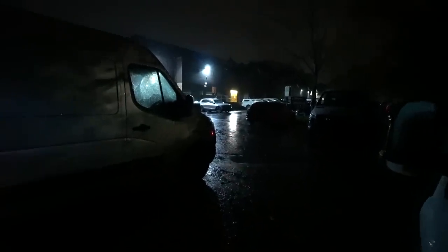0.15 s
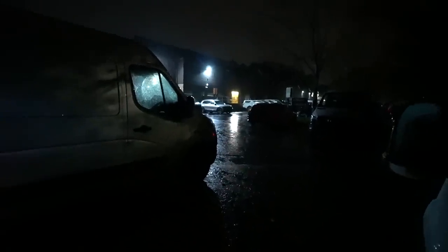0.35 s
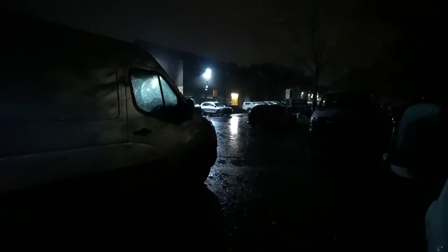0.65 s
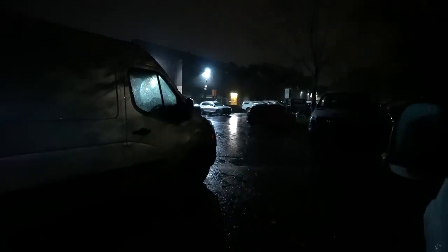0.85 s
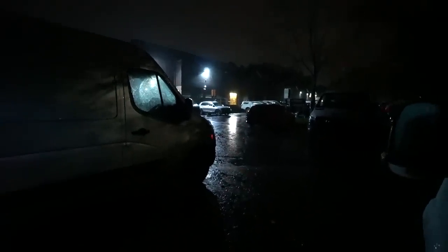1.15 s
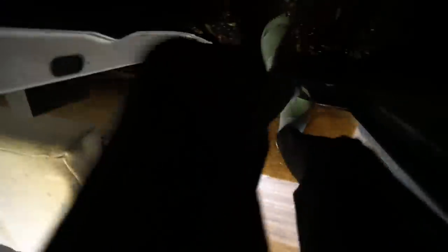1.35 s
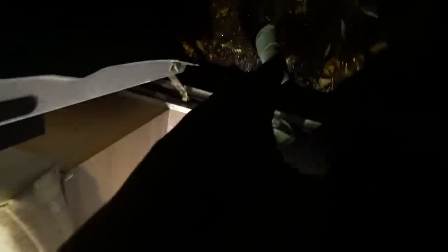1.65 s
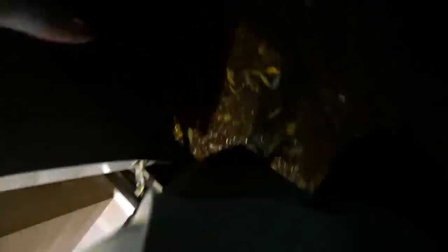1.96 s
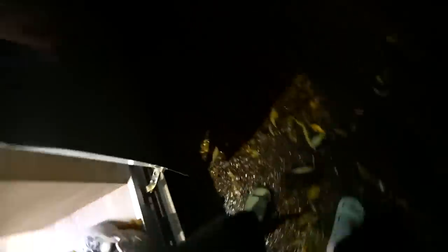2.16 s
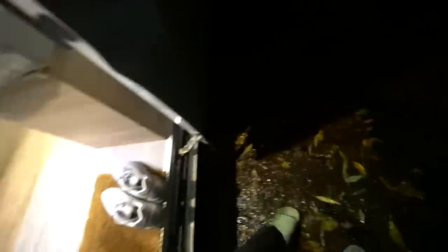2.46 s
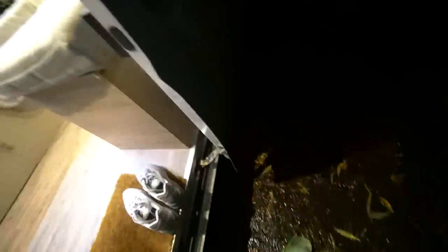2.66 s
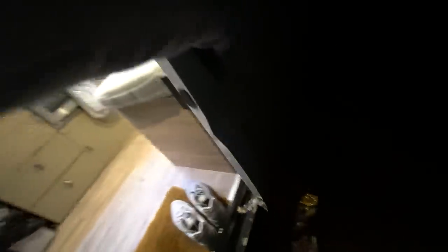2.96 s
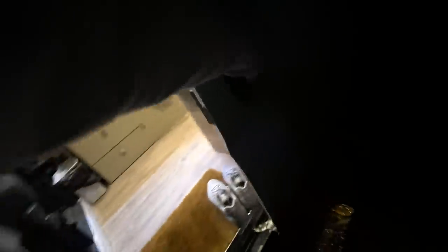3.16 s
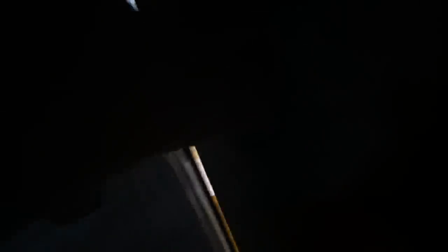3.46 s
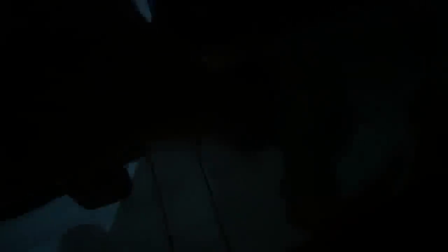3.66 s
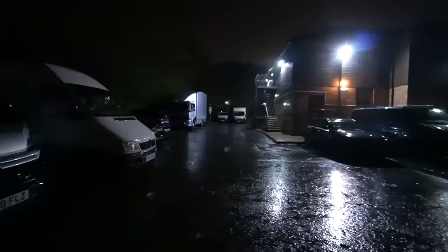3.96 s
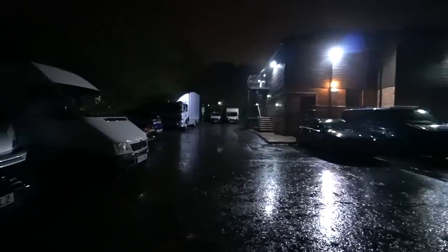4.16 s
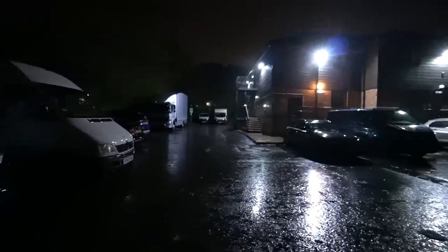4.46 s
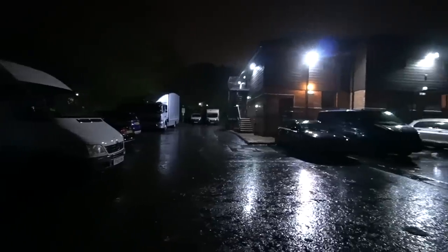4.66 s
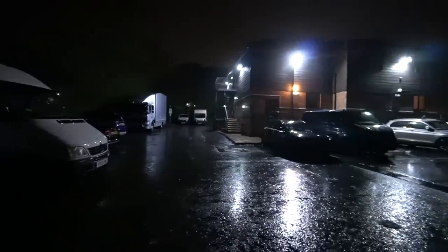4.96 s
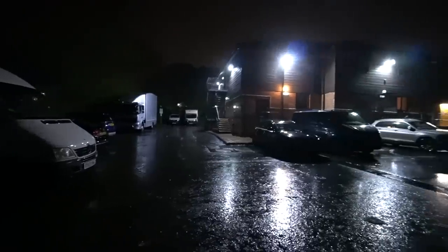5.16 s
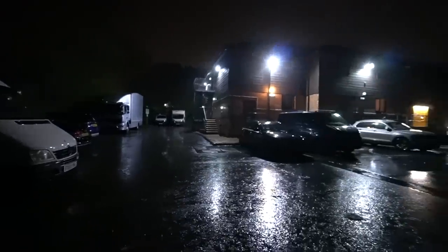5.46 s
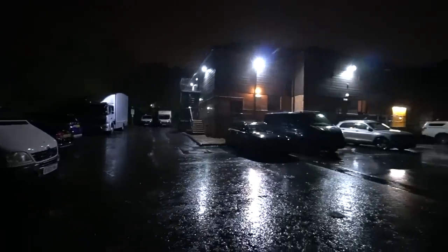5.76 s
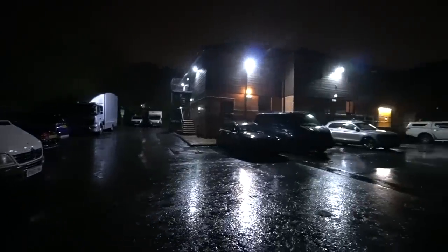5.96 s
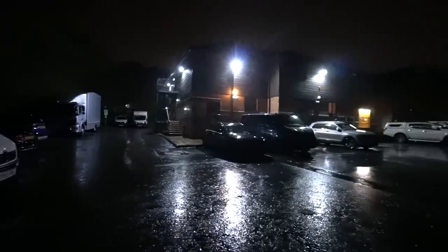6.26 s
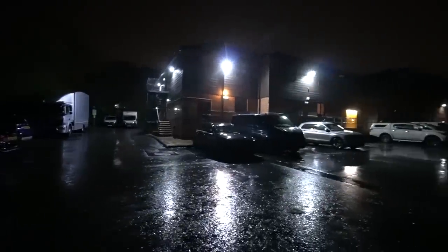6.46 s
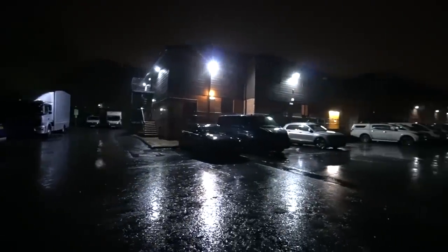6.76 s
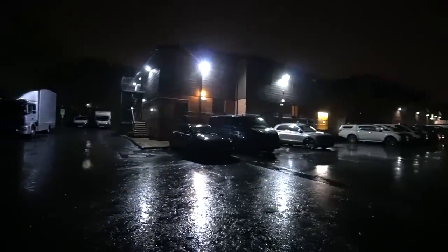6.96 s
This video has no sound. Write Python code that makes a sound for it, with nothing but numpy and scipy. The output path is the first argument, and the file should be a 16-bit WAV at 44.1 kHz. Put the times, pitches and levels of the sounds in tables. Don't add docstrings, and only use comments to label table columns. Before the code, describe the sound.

From 0 to 1.3 s heavy rain hisses and spatters close by on tarmac and parked cars, over uneven low air rumble. A fat drop thumps the microphone at 0.3 s, another at 1.1 s, as roof drumming swells around 1 s. The sound dips almost to silence at 1.32 s, then cuts to a van doorway: duller rain, a strong low shudder, rustling clothes and small ticks. At 1.75-2.05 s a shoe crunches and scuffs wet leaves and grit. Handle clicks begin near 2.65 s, with a clunk at 3.0 s; the sliding door rumbles louder, rattling, until it slams at 3.58 s, with metallic rebounds and boomy knocks to 3.8 s. At 3.87 s it cuts to an open yard: softer steady rain slowly rising to 7.1 s, with drop thumps near 4.3, 5.0 and 6.2 s, ticks around 6.7 s, and a very faint high whine after 5.1 s.

```python
import sys
import numpy as np
from scipy import signal
from scipy.fft import rfft, irfft, next_fast_len
from scipy.io import wavfile
from scipy.ndimage import uniform_filter1d, map_coordinates

SR = 44100
rng = np.random.default_rng(int(sys.argv[2]) if len(sys.argv) > 2 else 0)


def elevation(decibels):
    levels = np.asarray(decibels, float)
    return 10 ** (levels / 20)


def unload_wav(signal):
    wavfile.write(
        sys.argv[1],
        SR,
        np.round(np.clip(np.atleast_2d(signal).T, -1, 1) * 32767).astype(np.int16),
    )


N = 313992

CUTS = [
    1.325,
    3.866,
]


def unit(x):
    return x / np.sqrt(np.mean(x ** 2) + 1e-20)


def along(points, hz):
    f, v = np.transpose(points)
    return np.interp(np.log(hz + 1), np.log(f + 1), v)


def coloured(points):
    return lambda f: elevation(along(points, f))


def band(lo_hz, hi_hz):
    return lambda f: 1 / (1 + (lo_hz / (f + 1)) ** 4) / (1 + (f / hi_hz) ** 4)


def filtered(x, response):
    m = next_fast_len(N + SR // 2)
    spectrum = rfft(x, m) * response(np.fft.rfftfreq(m, 1 / SR))
    return unit(irfft(spectrum, m)[:N])


def curves(rows, outside_db=None):
    s, *cols = np.transpose(rows)
    return [np.interp(np.arange(N) / SR, s, c, outside_db, outside_db) for c in cols]


def shots():
    return np.searchsorted(CUTS, np.arange(N) / SR)


def per_shot(tables):
    return np.choose(shots(), [np.array(curves(rows)) for rows in tables])


def wobble(rate_hz):
    return map_coordinates(rng.standard_normal(N // 100), [np.arange(N) * rate_hz / SR])


def swell(s, rise_s, hold_s, fall_s):
    return np.interp(np.arange(N) / SR, np.cumsum([s, rise_s, hold_s, fall_s]), [0, 1, 1, 0])


def bump(s, width_s):
    return np.exp(-((np.arange(N) / SR - s) / width_s) ** 2)


def add(track, s, sound):
    track[round(s * SR):][:len(sound)] += sound[:N - round(s * SR)]


def crack(t, t60):
    snap = signal.lfilter([.3], np.poly([.55, .55, .55]), rng.standard_normal(len(t)))
    return snap * elevation(-60 * t / t60)


def patter(count, spread_db, share, patchy_db):
    z = signal.stft(rng.standard_normal(N), nperseg=512)[2]
    field = uniform_filter1d(rng.standard_normal(z.shape), 6, axis=0)
    field = uniform_filter1d(field, 12, axis=1)
    hiss = signal.istft(z * elevation(patchy_db * unit(field)), nperseg=512)[1][:N]
    when, size = rng.random((2, count))
    strength = elevation(-spread_db * np.log(np.maximum(size, .004)))
    drops = np.bincount((when * N).astype(int), strength, N)
    decay = signal.lfilter([1], [1, -np.exp(-1 / 30)], drops)
    splash = rng.standard_normal(N) * decay
    return np.sqrt(1 - share) * unit(hiss) + np.sqrt(share) * unit(splash)


def rain():
    # [t/s, level/dB]
    level = [
        [(0.0, -27), (0.15, -24.5), (0.7, -25), (1.06, -25.5), (1.2, -27.5)],
        [(1.44, -32), (2.0, -31.5), (2.26, -30), (3.02, -32), (3.46, -30), (3.86, -33)],
        [(3.89, -35.5), (4.84, -34), (5.99, -33.5), (6.33, -32), (7.12, -31.5)],
    ]
    # [f/Hz, density/dB per Hz]
    near_cars = [(290, -37), (500, -6), (585, -6), (961, -4), (1800, -5.5), (3420, -4.5), (6190, -17.5),
                 (7970, -22.5), (9000, -26.5), (11700, -38), (19800, -120)]
    doorway = [(290, -41), (500, -4), (811, 0), (1890, 0), (2780, 1), (5100, -9), (6490, -16.5),
               (7780, -19), (9000, -24.5), (11700, -52), (19800, -120)]
    open_yard = [(290, -27), (500, -4.5), (571, -5), (693, -1), (1660, -4), (2750, -3.5), (5100, -14.5),
                 (6490, -23), (9000, -29.5), (11700, -51), (19800, -120)]
    wash_colour = [(24, -26), (40, -7), (43, -14), (130, -10), (163, -11), (438, -12.5), (542, -20.5),
                   (800, -21), (1040, -49), (1760, -120)]
    spray_colour = [(3530, -1), (6000, -6), (8100, -2.5), (9310, -8.5), (12200, -10), (15100, -15),
                    (16000, -26)]
    shot = shots()
    body_db = per_shot(level)[0]
    gust_db = 5 * bump(.58, width_s=.3)
    spray_db = body_db + np.take([-17, -17.5, -17.6], shot) + gust_db
    wash_db = body_db + np.take([-4.8, -5.5, -2.3], shot)

    drops = patter(count=14000, spread_db=3.5, share=.28, patchy_db=1)
    body = np.choose(shot, [filtered(drops, coloured(c)) for c in (near_cars, doorway, open_yard)])
    wash = filtered(patter(count=2000, spread_db=3, share=.12, patchy_db=1), coloured(wash_colour))
    spray = filtered(patter(count=9000, spread_db=3, share=.1, patchy_db=1.2), coloured(spray_colour))
    rustle = filtered(patter(count=1100, spread_db=1, share=.9, patchy_db=1.1), band(2500, 13000))
    spray = spray + elevation(-6) * (shot == 1) * rustle
    flurry_db = .36 * wobble(6) + .7 * (shot == 1) * wobble(19)
    return (elevation(body_db + 2.5 + flurry_db) * body + elevation(wash_db + 1.5 * flurry_db) * wash
            + elevation(spray_db + 1 + 1.3 * flurry_db) * spray)


def car_roofs():
    passing = [(.1, -17), (.99, 0), (1.28, -11)]  # t/s, level/dB
    drumming = patter(count=5000, spread_db=3, share=.3, patchy_db=1.6)
    return elevation(curves(passing, -120)[0] - 25.5) * filtered(drumming, band(550, 1100))


def door():
    # [t/s, panel level/dB]
    roll = [(2.72, -49), (2.76, -37), (2.95, -23.5), (3.2, -16), (3.5, -14), (3.572, -20), (3.788, -26.5),
            (3.862, -44), (3.88, -47)]
    # [t/s, surge/dB]
    joints = [
        (3.0, 1.5),
        (3.2, 2),
        (3.27, -2),
        (3.4, 1),
        (3.49, 5),
    ]
    # [f/Hz, width/Hz, level/dB]
    panel = [(195, 62, 2), (144, 16, -8), (298, 67, -10.5), (411, 80, -2.5), (530, 93, -8), (624, 69, -24)]
    speed_db = curves(roll, -120)[0]
    jolt_db = sum(db * bump(s, width_s=.03) for s, db in joints)
    panel_db = speed_db + jolt_db
    shake_s = 3.545
    shake_db = -15 - 20 * (np.arange(N) / SR - shake_s)
    shake = swell(shake_s, rise_s=.03, hold_s=.23, fall_s=.07) * elevation(shake_db)
    frame = np.hypot(elevation(speed_db - 19 + 1.1 * jolt_db), shake)
    track = np.hypot(elevation(panel_db - 10), elevation(-7.5) * shake)

    def modes(f):
        return sum((-1) ** k * elevation(db) * 1j * f * w / (c * c - f * f + 1j * f * w)
                   for k, (c, w, db) in enumerate(panel))

    rollers = patter(count=6000, spread_db=3, share=.2, patchy_db=.4)
    out = elevation(panel_db - 2.5) * filtered(rollers, lambda f: modes(f) * band(120, 800)(f))
    out += frame * elevation(2.5) * filtered(rollers, band(41, 139))
    out += track * elevation(-3) * filtered(rollers, band(440, 1400))
    return out


def door_slam():
    # [t/s, level/dB, boom/dB]
    slams = [
        (3.575, 4.5, -12),
        (3.609, -4.5, -7),
        (3.645, -6.5, -5),
        (3.674, -23, -2),
        (3.699, -5, 1),
        (3.723, -6, -2),
        (3.764, -16.5, -1),
        (3.794, -23, 10),
    ]
    # [f/Hz, level/dB, t60/s]
    latch = [(470, 4, .05), (625, 4.5, 0.037), (890, -2, 0.025), (1230, -9, 0.034), (1960, 0, 0.014)]
    out, t = np.zeros(N), np.arange(SR // 8) / SR
    for s, db, boom_db in slams:
        ring = sum(elevation(level_db + rng.normal(0, 3.1) - 60 * t / t60)
                   * np.sin(2 * np.pi * hz * rng.normal(1, .035) * t) for hz, level_db, t60 in latch)
        boom = elevation(boom_db + 5 - 60 * t / .07) * np.sin(2 * np.pi * rng.uniform(60, 150) * t)
        onset = 1 - np.exp(-t / .00043)
        add(out, s, elevation(db - 9) * (ring + boom + .37 * crack(t, t60=.011)) * onset)
    return out


def step():
    # [t/s, length/s, level/dB, rising share, top of dull part f/Hz]
    scuffs = [
        (1.8365, 0.038, -18, 0.81, 4500),
        (1.873, 0.054, -21, 0.14, 1090),
        (1.912, 0.04, -18, 0.56, 4600),
        (1.946, 0.047, -25.5, 0.89, 4700),
        (2.033, 0.048, -24, 0.14, 3100),
        (1.755, .035, -28, .6, 4300),
        (6.709, .013, -33, .2, 4800),
        (1.448, .012, -36, .4, 5500),
    ]
    grit = patter(count=16000, spread_db=4.5, share=.85, patchy_db=3)
    crisp = filtered(patter(count=30000, spread_db=3, share=.6, patchy_db=2.5), band(5500, 15000))
    out, t = np.zeros(N), np.arange(SR // 12) / SR
    for s, length_s, db, rise, top_hz in scuffs:
        crisp_db = db - 16 + 24 * np.log2(top_hz / 4500)
        u = t / length_s
        stroke = np.clip(np.minimum(.5 + .67 * u / rise, (1 - u) / (1 - rise)), 0, 1)
        leaves = elevation(db) * filtered(grit, band(310, top_hz)) + elevation(crisp_db) * crisp
        add(out, s, stroke * leaves[round(s * SR):][:len(t)])
    return out


def hard_parts():
    # [t/s, peak/dB, f/Hz]
    stones = [(1.4306, -15.5, 2970), (1.452, -20, 5600), (1.7757, -12.5, 3524), (1.8373, -10, 2700),
              (1.8522, -10, 895), (1.859, -7, 1290), (1.866, -2.5, 2620), (1.8675, 2, 620),
              (1.869, -4, 1100), (1.879, -10, 800), (1.914, -8, 3080), (1.9184, -4, 3040),
              (1.931, -9, 3800), (1.9414, -10, 2283), (1.9486, -11, 2900), (1.9767, -3.5, 2480),
              (1.9864, -12, 2250), (2.0355, -9, 1830), (2.2687, -15, 3610)]
    # [t/s, peak/dB, f/Hz]
    handle = [
        (2.6553, -15, 2182),
        (2.6968, -14, 1037),
        (2.823, -9, 2340),
        (2.8764, -8.5, 1000),
        (2.9771, -6, 1040),
        (3.0009, 0, 1298),
        (3.0015, -6, 2200),
        (5.6236, -16.5, 2390),
    ]
    # [t/s, peak/dB, f/Hz]
    rattle = [(3.2507, -8, 2850), (3.2945, -17, 3400), (3.486, -14, 1160), (3.549, -15, 1500),
              (3.5743, -14, 890), (3.576, -9, 3300), (3.604, -8, 980), (3.612, -15, 3200),
              (3.6425, -12, 2600), (3.651, -9, 900), (3.674, -15, 1140), (3.678, -13, 2100),
              (3.725, -8, 1500), (3.7566, -14, 991)]
    out, t = np.zeros(N), np.arange(SR // 12) / SR
    for rows, t60, snap_db in ((stones, .008, -4), (handle, .012, -6), (rattle, .008, -4)):
        for s, db, hz in rows:
            ring = elevation(-60 * t / t60) * np.sin(2 * np.pi * hz * t)
            add(out, s, elevation(db - 1.5) * (ring + elevation(snap_db - 3) * crack(t, t60=.007)))
    return out


def housing_thumps():
    # [t/s, peak/dB, housing f/Hz, direction]
    thumps = [
        (0.307, -2, 157, 1),
        (1.1282, -8, 250, -0.96),
        (2.226, -15, 190, -0.83),
        (2.4624, -21, 126, -1.1),
        (4.3134, -11.5, 150, 1),
        (4.3293, -17, 350, -0.91),
        (5.0384, -10.5, 290, -1),
        (6.1655, -19, 188, 1),
        (6.212, -9, 130, 0.93),
        (6.237, -23, 200, 1),
    ]
    out, t = np.zeros(N), np.arange(SR // 25) / SR
    for s, db, hz, way in thumps:
        u = .74 * t * hz
        push = np.sin(7.5 * u ** .8) * (1 - np.exp(-(4 * u) ** 2)) * np.exp(-1.9 * u ** 1.5)
        add(out, s, way * elevation(db + 6) * push)
    return out


def housing_ticks():
    # [t/s, peak/dB, body/dB]
    ticks = [(1.4303, -29, 3), (1.6967, -23, 13), (1.7545, -28, 20), (1.767, -26, 23), (1.839, -8, -7),
             (1.8653, -19, 7), (1.919, -24, 5), (1.9283, -17, 2), (1.966, -14, 8), (2.0995, -14, -17),
             (2.1558, -24, 14), (2.2699, -17, 11), (2.3561, -22, 2), (2.471, -16.5, -11), (2.5835, -16, 12),
             (2.654, -26, 12), (2.9282, -22, 4), (3.0015, -8, 13), (3.2173, -29, 15), (3.251, -18, 14),
             (3.2925, -30, 8), (3.576, -20, 17), (3.644, -30, 24), (3.859, -23, -8), (3.8757, -27, -4)]
    # [t/s, peak/dB]
    drips = [
        (3.9475, -31),
        (4.3396, -29),
        (4.9328, -31),
        (5.0301, -31),
        (5.4392, -23),
        (5.833, -24),
        (6.6624, -29),
        (6.685, -18),
        (6.71, -19),
        (7.0475, -27),
    ]
    when, size = rng.random((2, 60))
    faint_s = CUTS[0] + when * (CUTS[1] - CUTS[0])
    faint_db = -34 - 2.2 * (np.log(size) + 1)
    faint = [(s, db, 11) for s, db in zip(faint_s, faint_db)]
    bright, dull = np.zeros((2, N))
    t = np.arange(300) / SR
    for s, db, body_db in ticks + [(s, db + 2.5, 0) for s, db in drips] + faint:
        burst = np.sign(rng.standard_normal(300)) * elevation(-60 * t / .004)
        add(bright, s, elevation(db) * burst)
        add(dull, s, elevation(db + body_db) * burst)
    crisp = signal.sosfilt(signal.butter(2, [6000, 15000], "band", fs=SR, output="sos"), bright)
    body = signal.sosfilt(signal.butter(2, [2000, 5500], "band", fs=SR, output="sos"), dull)
    return elevation(-4) * crisp + elevation(-3) * body


def rocking():
    # [t/s, level/dB]
    movement = [
        [(0.0, -17), (0.4, -16), (0.76, -24), (0.94, -16), (1.2, -20)],
        [(1.44, -18), (1.68, -7), (1.88, -13), (2.1, -8), (2.5, -14), (3.4, -20), (3.74, -11), (3.86, -16)],
        [(3.89, -33), (4.2, -22), (4.53, -29), (6.1, -19), (7.12, -24)],
    ]
    # [f/Hz, density/dB per Hz]
    air_colour = [
        [(2.4, -27), (4.0, 7), (22, 5), (31, -1), (49, -23), (110, -15.5), (140, -45), (240, -120)],
        [(2.4, -38), (4.0, 8), (16, 8.5), (27, -2), (36, -4), (54, -23), (60, -23), (78, -54), (130, -120)],
        [(2.4, -21), (4.0, 3.5), (22, 1.5), (31, -9.5), (36, -15), (43, -26), (60, -12.5), (78, -48),
         (130, -120)],
    ]
    # [t/s, length/s, level/dB, f/Hz]
    springs = [
        (1.459, .18, -5, 22.8),
        (2.65, .24, -11, 20.8),
        (2.95, .17, -9, 20.6),
    ]
    air = rng.standard_normal(N)
    swing = np.choose(shots(), [filtered(air, coloured(c)) for c in air_colour])
    swing = swing / np.sqrt(np.abs(uniform_filter1d(swing ** 2, size=SR // 6)) + .027)

    t = np.arange(N) / SR
    last = np.maximum(np.searchsorted([s for s, *_ in springs], t) - 1, 0)
    start_s, _, _, hz = np.transpose(springs)[:, last]
    since_s = t - start_s
    turn = 2 * np.pi * (hz - 8 / 2 * since_s) * since_s + 1.35
    bounce = np.sin(turn) - .16 * np.sin(3 * turn) + .07 * np.sin(5 * turn)
    settle_s = .04
    shudder = sum(elevation(db) * swell(s, settle_s, length_s - settle_s, settle_s) for s, length_s, db, _ in springs)

    air_gain = elevation(per_shot(movement)[0] + 1.8 * wobble(7))
    push = air_gain * swing / (1 + 6 * shudder) + shudder * bounce
    held = .62 * np.tanh(push / .62)
    return uniform_filter1d(uniform_filter1d(held, size=120), size=120)


def lamp():
    # [t/s, f/Hz]
    whine = [(5.1, 15450), (5.8, 15200), (6.3, 15080), (7.12, 15050)]
    on = np.arange(N) / SR > whine[0][0]
    level = elevation(-76 + 3 * wobble(5))
    hz = curves(whine)[0] + 12 * wobble(40)
    return on * level * np.sin(2 * np.pi * np.cumsum(hz) / SR)


def scene():
    mix = rain() + car_roofs() + door() + door_slam() + step() + hard_parts()
    mix = mix + housing_thumps() + housing_ticks() + rocking() + lamp()
    return mix[None]


def roll_off(x):
    return signal.sosfilt(signal.butter(12, 16490, fs=SR, output="sos"), x)


def record(dry):
    # [t/s, gain]
    fade = [(1.215, 1), (1.3, .27), (1.3235, .004), (1.3265, .004), (1.35, .3), (1.43, 0.98)]
    squashed = dry / (1 + np.abs(dry / .74) ** 6) ** (1 / 6)
    faded = squashed * curves(fade)[0]
    limited = irfft(rfft(faded) * (np.fft.rfftfreq(N, 1 / SR) < 15800), N)
    return roll_off(limited)


dry = scene()
out = record(dry)
unload_wav(out)
```